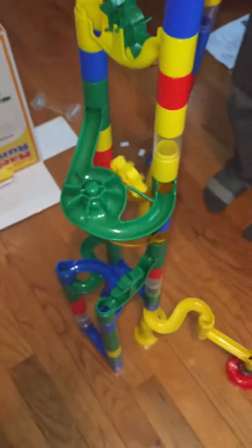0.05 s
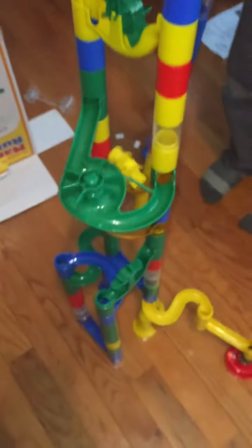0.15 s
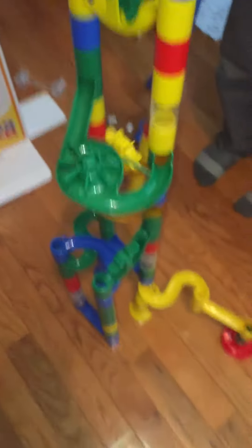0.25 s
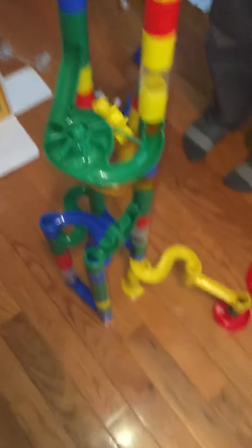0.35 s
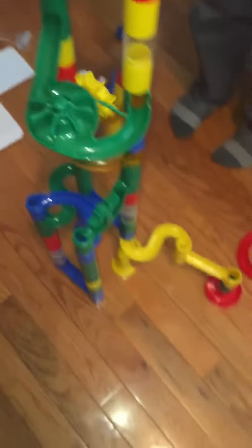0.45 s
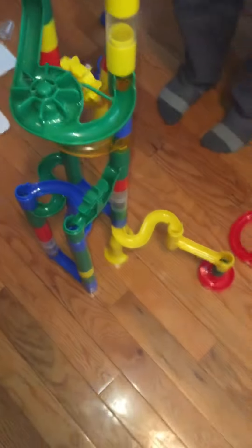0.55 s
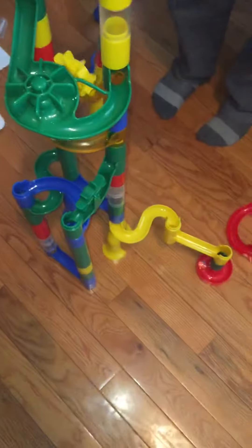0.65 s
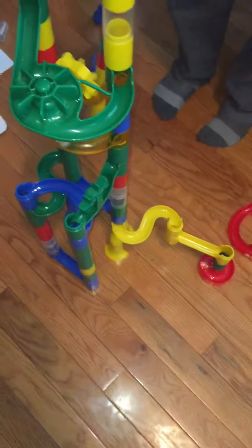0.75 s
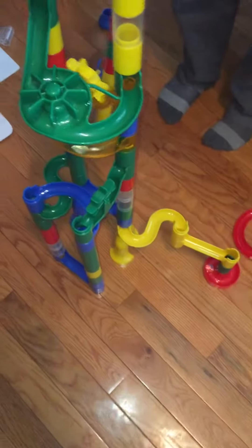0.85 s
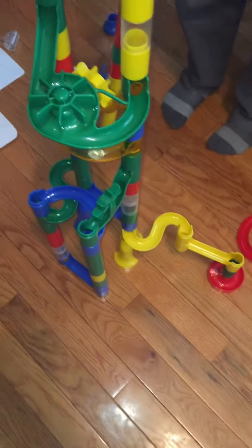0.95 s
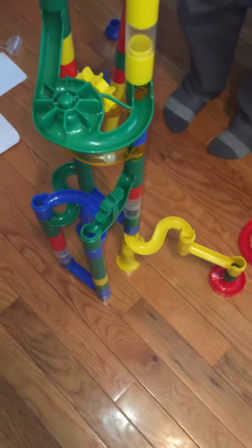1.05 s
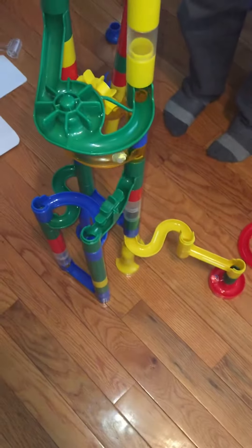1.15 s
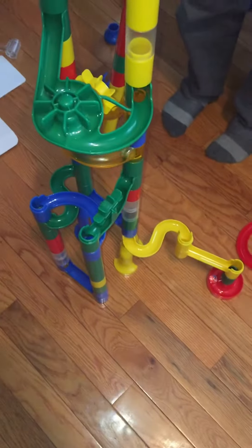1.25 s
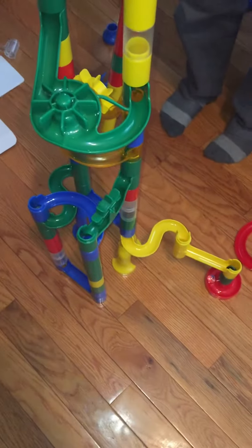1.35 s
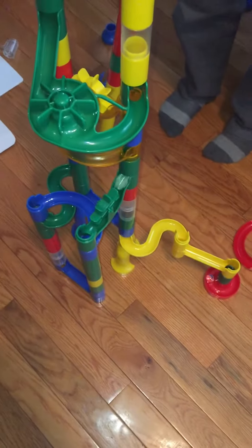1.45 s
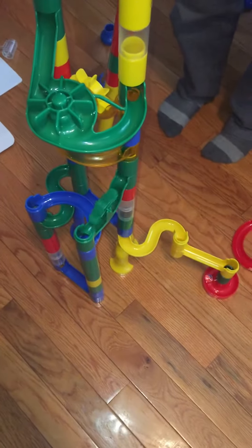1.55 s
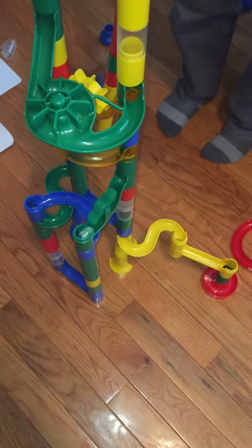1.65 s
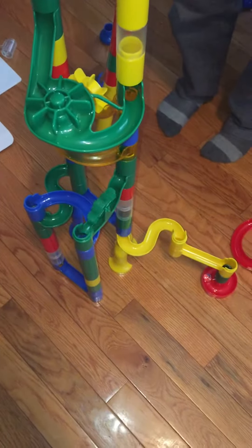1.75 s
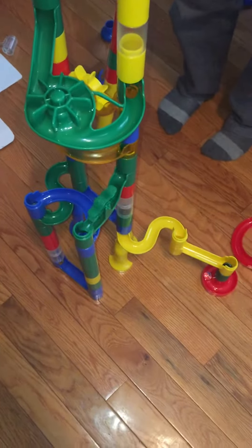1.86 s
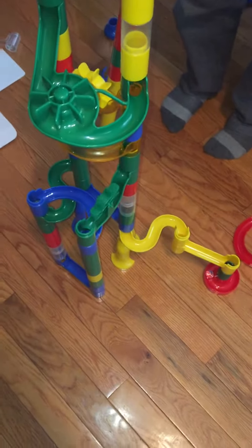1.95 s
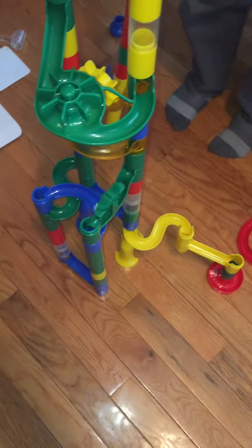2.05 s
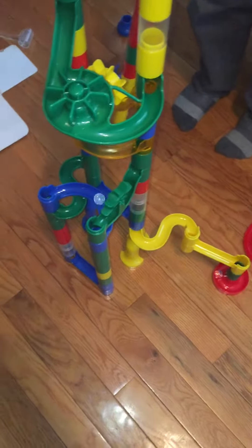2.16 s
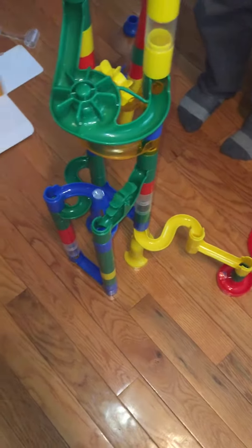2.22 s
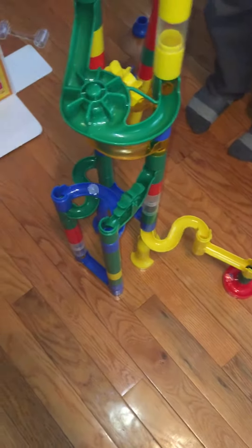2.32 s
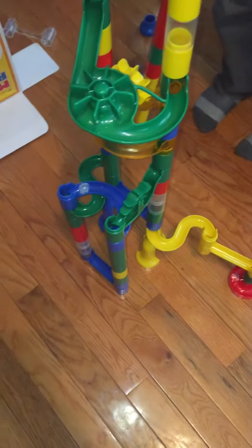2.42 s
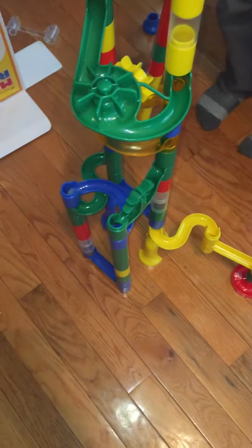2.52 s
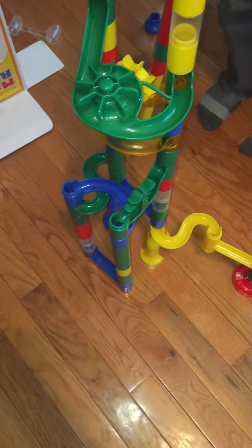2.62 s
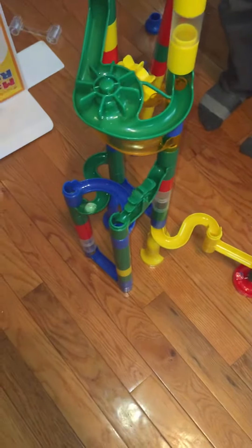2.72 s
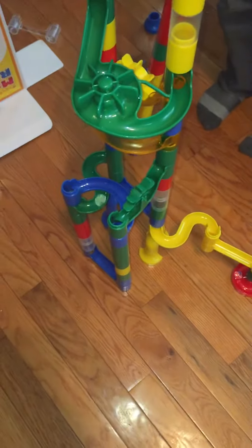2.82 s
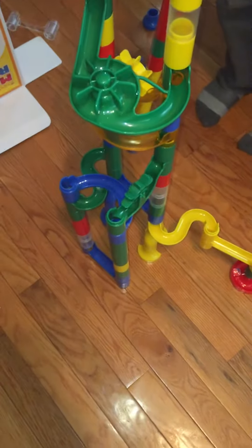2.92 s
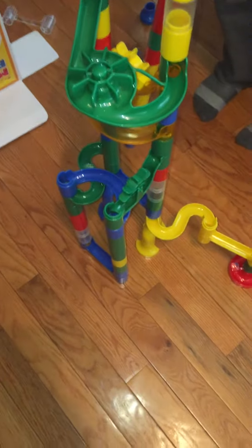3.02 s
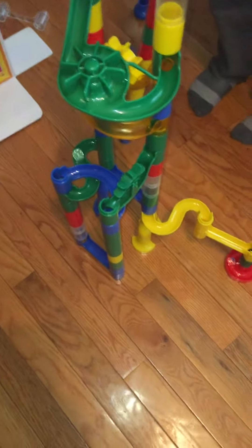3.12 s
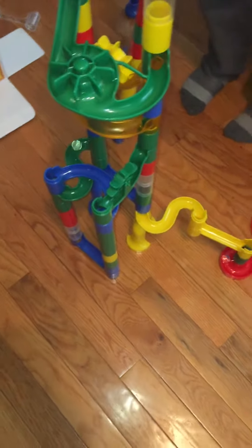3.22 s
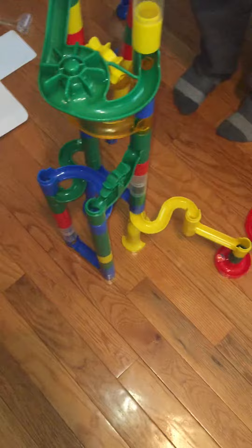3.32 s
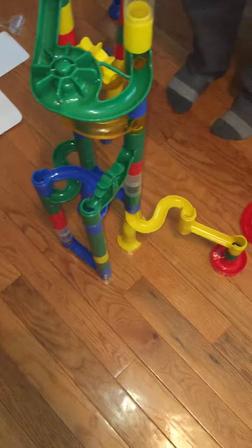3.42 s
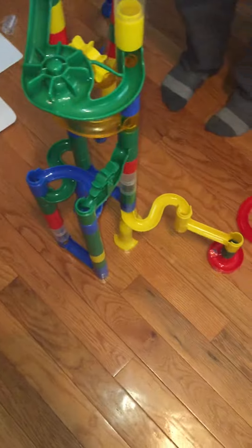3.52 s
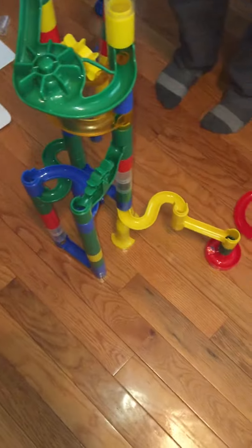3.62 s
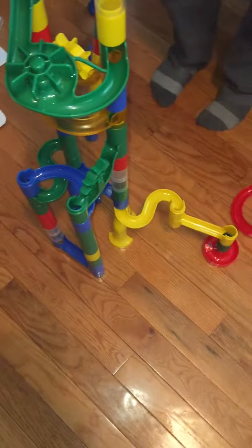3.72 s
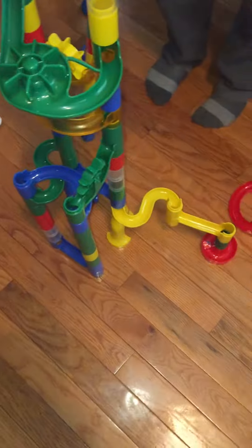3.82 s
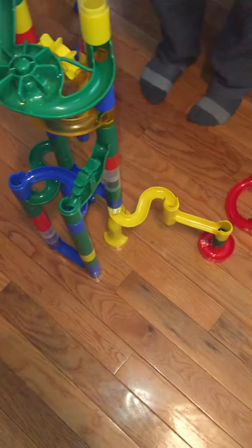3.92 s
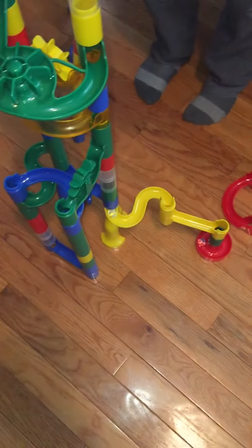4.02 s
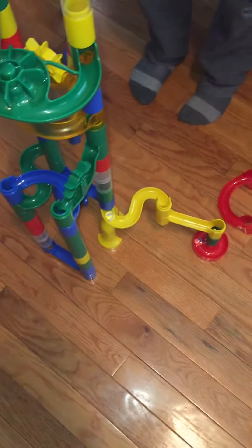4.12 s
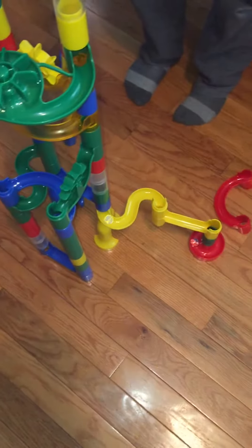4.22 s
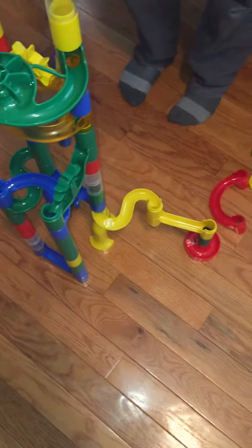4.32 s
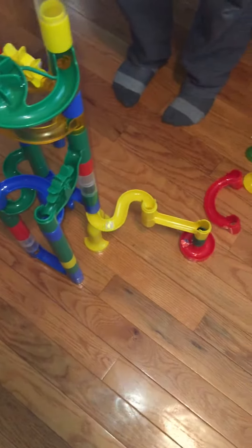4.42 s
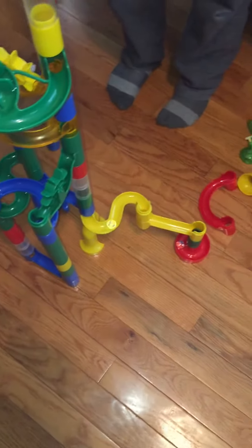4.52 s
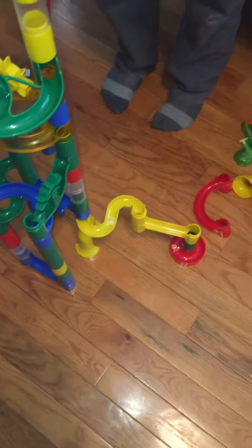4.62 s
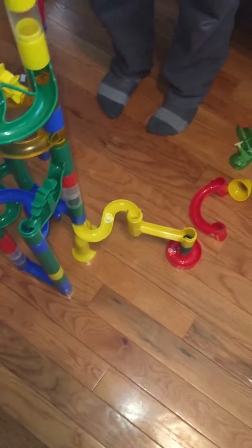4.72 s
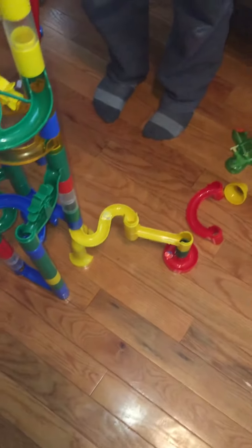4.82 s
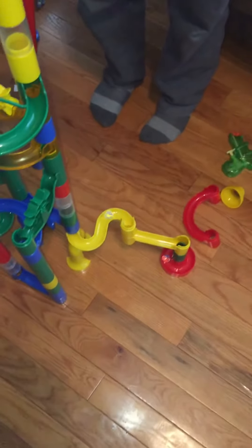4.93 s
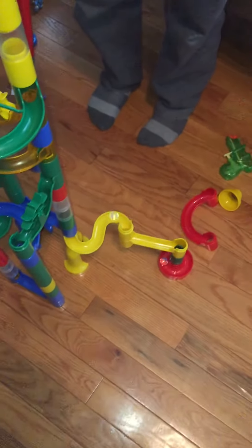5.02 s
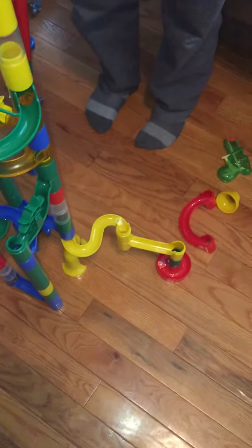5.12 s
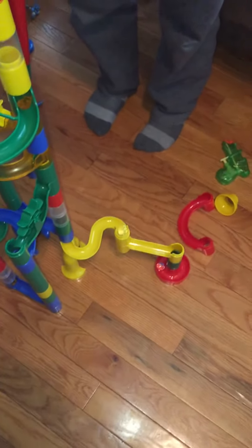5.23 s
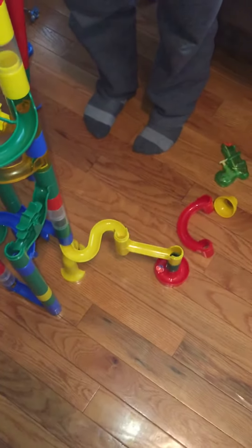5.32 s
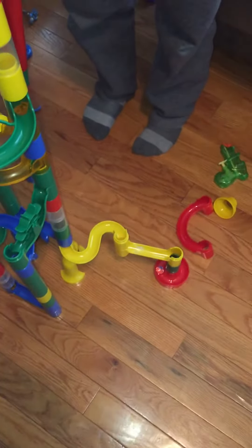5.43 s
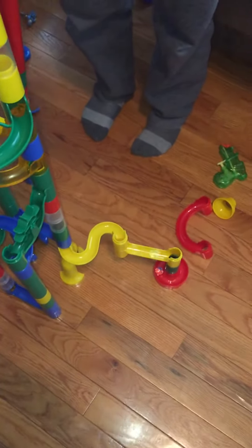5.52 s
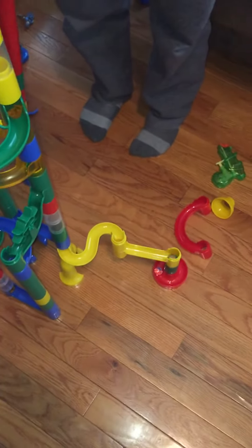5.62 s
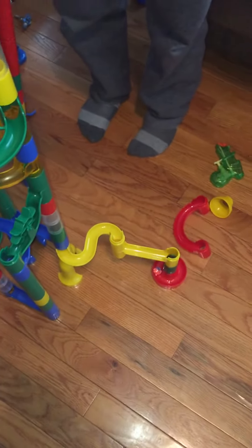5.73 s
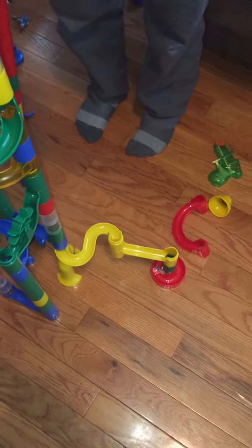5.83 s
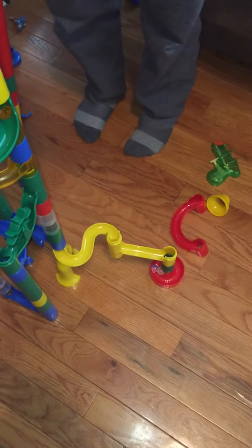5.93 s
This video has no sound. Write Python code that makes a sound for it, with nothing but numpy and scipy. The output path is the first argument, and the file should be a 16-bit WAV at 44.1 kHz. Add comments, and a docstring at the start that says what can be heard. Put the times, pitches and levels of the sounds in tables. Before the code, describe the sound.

A glass marble descends a plastic toy tower in a quiet home room. A hard clatter opens, a faint roll follows, then clustered knocks with a tiny bright glass clink near 1.5 seconds. More rattling drops alternate with gritty rolls and ticks, then a low quiet roll and two final clatters near the floor. Close small microphone, one channel, short room reflections.

```python
"""A quiet room with a wooden floor, where a glass marble works its way down a plastic toy tower.
Rolling is dense random tiny blows, a few much stronger, that ring the piece, over a noise rumble.
Falls are knocks and chatter: noise bursts for the clack, decaying sines for the piece and its support.
Three bright bursts are glass on glass; the lowest pieces shake the floorboards instead of the tower.
Behind: a few soft deep bumps, room air as coloured noise and a thin whine."""
import sys
import numpy as np
from scipy import signal
from scipy.fft import rfft, irfft, next_fast_len
from scipy.io import wavfile
from scipy.ndimage import map_coordinates

SR = 44100
rng = np.random.default_rng(int(sys.argv[2]) if len(sys.argv) > 2 else 0)


def generate_wav(signal):
    """Clip the signal to [-1, 1] and save it as 16-bit WAV at the path in sys.argv[1]."""
    frames = np.transpose(np.atleast_2d(signal))
    scaled = np.clip(frames, -1, 1) * 32767
    pcm = np.round(scaled).astype(np.int16)
    wavfile.write(sys.argv[1], SR, pcm)


N = 263154
LENGTH = 8192  # samples of one struck sound
T = np.arange(LENGTH) / SR


def rattle(clack_db=22, ring_db=23, contact_hz=9000, radiates_hz=45):
    """Every contact clacks, rings the piece that the marble has reached and shakes its support."""
    track = np.zeros(N)
    for start_s, level_db, body_db, treble_db in contacts():
        _, piece_db, boom_db, piece_modes, support_modes = piece_at(start_s)
        edge_hz = contact_hz * amp(treble_db / 2)
        piece = amp(piece_db) * softened(ring(piece_modes, scatter_db=-1.0), edge_hz)
        boom = amp(boom_db + body_db / 2) * ring(support_modes, scatter_db=2.5)
        blow = amp(clack_db) * clack(body_db, treble_db, edge_hz)
        blow = blow + amp(ring_db) * (piece + boom)
        add(track, start_s, amp(level_db) * in_room(blow, wet_db=-6))
    return thinned(track, radiates_hz)


# Falls through a tube onto the next piece. Each row: start in seconds, treble in dB and body in dB
# of its knocks before the shifts with age and force, chatter in dB at the start.
DROPS = [(0, -12, -10.5, -31), (1.403, -5, -13, -31.5), (1.767, -4, -9, -32.5), (2.634, -2.5, -4, -30.5),
         (3.514, -4, -8.5, -32.5), (3.862, -5, -16, -31), (5.376, -7.5, -11, -34), (5.718, -3, -14, -32)]
# Hard knocks of those falls. Each row: start in seconds, relative level in dB.
KNOCKS = [(0.0003, -11.5), (0.0362, -20.5), (0.0803, -24), (0.1063, -23.5), (0.1445, -27), (1.4046, -18),
          (1.4176, -19.5), (1.4715, -14.5), (1.4846, -18.5), (1.5011, -12), (1.5965, -22.5),
          (1.6165, -26.5), (1.7679, -18), (1.7917, -25), (1.8092, -24.5), (1.8361, -16.5), (1.8522, -25),
          (1.8924, -22), (2.6352, -20.5), (2.653, -25.5), (2.6939, -24), (2.7178, -24), (2.756, -25.5),
          (2.7817, -32.5), (3.5143, -20.5), (3.529, -23), (3.5732, -18), (3.583, -18), (3.5954, -21.5),
          (3.6277, -18.5), (3.8634, -17), (3.8831, -22), (3.9236, -13), (3.9363, -24), (3.9492, -18.5),
          (3.9899, -21.5), (4.0248, -23), (4.0468, -27), (5.3769, -26.5), (5.3932, -22.5), (5.4057, -20.5),
          (5.4355, -21.5), (5.461, -30.5), (5.7203, -19), (5.7395, -20.5), (5.754, -25.5), (5.7917, -18.5),
          (5.8284, -16.5), (5.8826, -24.5), (5.91, -27)]
# Light touches on a rim or joint while rolling. Each row: start in seconds, relative level in dB,
# treble in dB.
TICKS = [(1.296, -48.5, -26.5), (1.3314, -42.5, -38.5), (1.3609, -54.5, -25), (1.3766, -56.5, -28),
         (1.7346, -38.5, -21.5), (2.1958, -51.5, -13), (2.3405, -49, -21), (2.4661, -48, -20),
         (2.5472, -45, -14), (2.5786, -38, -14.5), (3.1249, -54, -15), (3.1862, -33, -6),
         (3.4357, -47, -21), (3.4805, -43, -20.5), (4.4463, -45, -3), (4.655, -58.5, -19.5),
         (4.962, -44, -15.5), (5.2896, -54, -15), (5.6545, -36, -19.5)]


def contacts(chatter_count=6, chatter_s=0.15, chatter_fade_db_per_s=28, tick_body_db=-9.5,
             dulling_db_per_s=34.5, body_fill_db_per_s=23, usual_knock_db=-26, body_give=0.6):
    """Knocks, chatter and ticks as (s, dB, body dB, treble dB); later bounces are softer contacts."""
    blows = list(KNOCKS)
    for start_s, _, _, chatter_db in DROPS:
        slots = np.arange(chatter_count) + rng.random(chatter_count)
        for age_s in chatter_s * slots / chatter_count:
            level_db = chatter_db - chatter_fade_db_per_s * age_s + rng.normal(0, 1.5)
            blows.append((start_s + age_s, level_db))

    rows = [(start_s, level_db, tick_body_db, treble_db) for start_s, level_db, treble_db in TICKS]
    for blow_s, level_db in blows:
        # a fall takes over 0.1 s before its start
        fall = sum(blow_s >= drop[0] - .1 for drop in DROPS[1:])
        start_s, treble_db, body_db, _ = DROPS[fall]
        age_s = blow_s - start_s
        # low in the tube, bounces shake more of the tower
        body_db += body_fill_db_per_s * age_s
        # a harder knock gains mostly clack: body_give dB of body lost per dB above the usual
        body_db -= body_give * max(level_db - usual_knock_db, 0)
        rows.append((blow_s, level_db, body_db, treble_db - dulling_db_per_s * age_s))
    return rows


# Resonances of each piece of track. Each row: frequency in Hz, width in Hz, level in dB.
TOP_RAMP = [(864, 23, -4.5), (1380, 12, 2.5), (1857, 20, 2), (3830, 30, -20.5), (4130, 93, -16),
            (6000, 48, -8)]
AMBER_CURVE = [(895, 37, -6), (1197, 24, -5.5), (1870, 14, -0.5), (2930, 14, -9.5), (3480, 29, 0.5),
               (5600, 57, -22.5), (6440, 190, -11)]
BLUE_CURVE = [(1150, 6.4, -6.5), (1656, 7.2, 5), (2410, 25, 0), (3487, 320, -11.5), (3980, 25, -16.5),
              (6200, 110, -18)]
GREEN_CURVE = [(239, 70, -27), (770, 25, -17), (1690, 12, 13.5), (2400, 56, 0), (3153, 140, 6.5),
               (5800, 95, -13), (6160, 120, -15)]
LOW_CURVE = [(866, 34, 5), (1860, 28, 9.5), (2000, 58, -3.5), (2520, 72, 6), (4100, 440, -3),
             (4490, 38, -1)]
YELLOW_BEND = [(876, 45, 0), (1213, 11, 2), (1828, 23, 8.5), (2406, 73, -6), (3250, 39, -7.5),
               (5370, 29, -29.5), (6050, 110, -15)]
LAST_RAMP = [(1505, 44, -10), (1766, 53, 1.5), (1770, 34, -2.5), (2430, 44, -2), (2890, 56, 2),
             (3700, 39, 5.5), (4550, 140, 0.5), (5240, 44, -16.5)]
RAMP_END = [(1498, 15, 0.5), (1798, 29, 0.5), (2632, 26, -0.5), (2953, 18, 9), (4004, 48, -4),
            (6850, 46, -4)]
END_CUP = [(1387, 41, 1), (1697, 43, 4), (2422, 80, -22.5), (3510, 50, -2.5), (4300, 53, -3.5),
           (4600, 70, -1.5)]
SMALL_LOOP = [(585, 43, 4), (2000, 45, -14), (2610, 35, 5), (2980, 73, -0.5), (3400, 19, 8)]
YELLOW_CREST = [(594, 23, -0.5), (1745, 46, -9), (2760, 29, -0.5), (3340, 93, -1)]
# Low resonances of what carries the piece. Each row: frequency in Hz, width in Hz, level in dB.
TOWER = [(85, 6.7, -6), (202, 20, 4), (239, 18, -8.5), (387, 13, -4.5), (475, 11, 0.5), (570, 13, 4.5),
         (632.7, 27, -4)]
STEM = [(212, 25, -6.5), (390, 22, -10), (449, 28, -0.5), (492, 16, 3), (640, 36, -0.5), (953, 44, 0)]
HANGING_ARM = [(216, 15, 0.1), (256, 30.2, 0.16), (274.3, 12, 0.56), (329, 3.3, 0), (366, 14.2, 0.045)]
BOARDS = [(71.7, 11, -21), (138.6, 12.2, -3), (291.3, 10.5, 2.5), (469, 11, 0), (571.6, 12.5, -7)]
# The way down. Each row: start in seconds from which the piece is struck, relative ring in dB,
# relative boom in dB, resonances of the piece, resonances of its support.
PIECES = [(0, -6, -18, TOP_RAMP, TOWER), (1.2, -3.5, -10, AMBER_CURVE, STEM),
          (1.68, -2.5, -15, BLUE_CURVE, TOWER), (2.62, -6.5, -7, GREEN_CURVE, HANGING_ARM),
          (3.0, -5.5, -12.5, SMALL_LOOP, HANGING_ARM), (3.4, -4, -14, LOW_CURVE, TOWER),
          (3.84, -4, -5, YELLOW_BEND, STEM), (4.8, 2, -17.5, YELLOW_CREST, TOWER),
          (5.2, -0.5, 2, YELLOW_BEND, STEM), (5.37, -1.5, -6, LAST_RAMP, BOARDS),
          (5.6, 2.5, -9, RAMP_END, BOARDS), (5.78, -2, -7.5, END_CUP, BOARDS)]


def piece_at(time_s):
    """The piece of track that the marble has reached at time_s."""
    return PIECES[sum(time_s >= piece[0] for piece in PIECES[1:])]


def ring(modes, scatter_db):
    """Struck modes of energy 1; each blow lands elsewhere and shares its force anew."""
    hz, width_hz, level_db = np.transpose(modes)[:, :, None]
    gain = amp(level_db + scatter_db * rng.standard_normal(hz.shape)) * width_hz
    gain = gain * rng.choice([-1, 1], hz.shape)
    decay = np.exp(-np.pi * width_hz * T)
    sound = np.sum(gain * decay * np.sin(2 * np.pi * hz * T), 0)
    return sound / np.linalg.norm(sound)


def clack(body_db, treble_db, edge_hz):
    """Slow bending waves need a moment to spread over the piece; treble comes first and dies first."""
    body = burst([(90, -27.5), (200, 5), (950, -0.5), (1300, -17.5)], t60_s=0.11, rise_s=.002)
    middle = burst([(900, -31.5), (1200, 1), (4500, -2.5), (5600, -26)], t60_s=0.031, rise_s=0.00074)
    treble = burst([(4200, -30), (5200, 0)], t60_s=.018, rise_s=.0003)
    return amp(body_db) * body + softened(middle, 2 * edge_hz) + amp(treble_db) * treble


# Spectrum of the struck plastic shell. Each row: frequency in Hz, level in dB per Hz.
SHELL = [(50, -25.5), (150, -9.5), (400, -23.5), (750, -11.5), (1100, -6), (1700, 5), (2700, 2), (3700, 5),
         (4900, -5), (7000, -11.5), (10200, -18), (11800, -20), (16000, -27)]


def burst(band, t60_s, rise_s):
    """One band of the crowded, heavily damped modes of thin plastic, struck once; energy 1."""
    sound = colour(noise(SHELL, LENGTH), band)
    sound = sound * fade(T, t60_s) * (1 - np.exp(-T / rise_s))
    return sound / np.linalg.norm(sound)


# Clicks of glass on glass. Each row: start in seconds, level in dB.
GLASS_CLICKS = [(1.5629, -13.5), (1.5756, -14.5), (1.5855, -16.5)]
# Spectrum of a glass click. Each row: frequency in Hz, level in dB per Hz.
GLASS = [(500, -16), (3200, -8.5), (5500, -6), (9300, -4), (10300, -12.5), (11200, 2), (12500, 2.5),
         (13800, -8.5), (16000, -16)]


def glass(t60_s=.009):
    """Glass meets glass: very short, very bright clicks of decaying noise."""
    track = np.zeros(N)
    for start_s, level_db in GLASS_CLICKS:
        click = noise(GLASS, LENGTH) * fade(T, t60_s)
        add(track, start_s, amp(level_db) * in_room(click, wet_db=-7.0, floor_echo=.2))
    return track


# Spectrum of the drumming track. Each row: frequency in Hz, level in dB per Hz.
RUMBLE = [(40, -30), (90, -8), (180, -9), (265, 1), (380, -9), (600, -16.5), (1200, -25), (3000, -51.5)]
# Spectrum of the shell's answer to tiny bumps. Each row: frequency in Hz, level in dB per Hz.
GRIT = [(200, -29.5), (600, -8.5), (900, -4), (1150, -6), (1500, 3.5), (1850, 3.5), (2300, -9), (3400, -10),
        (4700, -20), (7000, -29.5), (10000, -35.5), (16000, -46.5)]


def rolling(rumble_db=-1, grit_db=-2, lumps_db=3, flutter_db=3, contact_hz=2400, skips_per_s=800):
    """The turning marble drums the track and skips over tiny bumps, which ring the piece under it."""
    rumble_gain, grit_gain, ring_gain = roll_gains()
    rumble = noise(RUMBLE, N) * unit(amp(lumps_db * wobble(28)))
    # the marble presses harder and lighter as it sways between the rims
    pressure = amp(flutter_db * wobble(30))
    blows = unit(skips(skips_per_s) * pressure)
    # the plastic answers a little differently on each short stretch of the way
    grit = np.zeros(N)
    stretch = SR // 12
    for start in range(0, N, stretch):
        here = slice(start, start + stretch)
        shell = noise(GRIT, LENGTH) * fade(T, 0.092)
        shell = amp(grit_db) * shell / np.linalg.norm(shell)
        piece_modes = piece_at(start / SR)[3]
        piece = softened(ring(piece_modes, scatter_db=9.5), contact_hz)
        shell_answer = signal.fftconvolve(grit_gain[here] * blows[here], shell)
        piece_answer = signal.fftconvolve(ring_gain[here] * blows[here], piece)
        add(grit, start / SR, in_room(shell_answer + piece_answer, wet_db=-7))
    return amp(rumble_db) * rumble_gain * rumble + grit


# Rolls along one piece. Each row: start in seconds, end in seconds, relative grit in dB (the roll
# ends half the gain below it), gain on the way in dB, rumble in dB and ring in dB over the grit.
ROLLS = [(0.418, 1.3, -76, 2, 6, -13.5), (1.315, 1.766, -43.5, 4, -12, -4), (2.02, 2.632, -47, 13, 3, -16),
         (2.8, 3.06, -60.5, -8, -6, -2), (3.12, 3.452, -60.5, -3.5, -4, -9), (3.55, 3.867, -42, 3, -13, -4),
         (4.23, 4.566, -74.5, -2.5, 12.5, -8), (4.62, 5.276, -71, 1.5, 8.5, -9),
         (5.31, 5.7, -41.5, 11, -10, 1)]


def roll_gains(edge_s=0.03):
    """Gains of rumble, grit and ring: a roll grows as the marble gathers speed, or fades as it slows."""
    t = np.arange(N) / SR
    gains = np.zeros((3, N))
    for start_s, end_s, grit_db, gained_db, rumble_db, ring_db in ROLLS:
        way = np.clip((t - start_s) / (end_s - start_s), 0, 1)
        outside_s = np.abs(t - np.clip(t, start_s, end_s))
        gain = amp(grit_db - gained_db * (1.5 - way)) * np.exp(-(outside_s / edge_s) ** 2)
        shares = np.array([[amp(rumble_db)], [1], [amp(ring_db)]])
        gains = np.maximum(gains, gain * shares)
    return gains


def skips(per_s):
    """Random tiny blows, a few much stronger than the rest."""
    return (rng.random(N) < per_s / SR) * rng.laplace(size=N)


# Dull bumps. Each row: start in seconds, level in dB, swell in seconds, low cut in Hz.
BUMPS = [(.5, -58, 0.021, 25), (1.069, -51, 0.0087, 140), (1.13, -58, 0.028, 25), (2.271, -66, .025, 25)]
# Spectrum of a bump. Each row: frequency in Hz, level in dB per Hz.
BUMP = [(15, -19), (32, 8), (55, -3), (140, -6), (300, -19), (800, -32), (3000, -80)]


def soft_bumps():
    """Soft, deep bumps: low noise that swells to a peak after swell_s and dies away."""
    track = np.zeros(N)
    for start_s, level_db, swell_s, low_hz in BUMPS:
        thud = unit(thinned(noise(BUMP, LENGTH), low_hz))
        swell = T / swell_s * np.exp(1 - T / swell_s)
        add(track, start_s, amp(level_db) * thud * swell)
    return track


# Spectrum of the room air. Each row: frequency in Hz, level in dB per Hz.
AIR = [(15, -39), (25, -7), (69, 0.5), (103, -9), (202, -7), (264, -3.5), (462, -16), (952, -10.5),
       (1910, -17), (2070, -20.5), (3830, -22), (4150, -23), (15000, -34)]


def background(air_db=-66, whine_db=-74, whine_hz=15735):
    """Still room air and the thin whine of some electric appliance, its level wandering."""
    whine = np.sqrt(2) * np.sin(2 * np.pi * whine_hz * np.arange(N) / SR)
    return amp(air_db) * noise(AIR, N) + amp(whine_db + 2.5 * wobble(5)) * whine


# Decay of the room. Each row: frequency in Hz, t60 in seconds.
ROOM = [(100, 0.76), (300, 0.16), (800, 0.44), (2000, 0.44), (5000, 0.33), (9000, 0.29), (15000, 0.15)]


def in_room(x, wet_db, floor_echo=0.61, floor_s=.0026, build_s=0.0024):
    """The direct sound, its mirror image in the floor and a diffuse tail, new for each spot."""
    hz, t, z = signal.stft(rng.standard_normal(SR // 2), SR, nperseg=256)
    tail = signal.istft(z * fade(t, along(ROOM, hz)[:, None]), SR, nperseg=256)[1]
    tail = tail * (1 - np.exp(-np.arange(len(tail)) / SR / build_s))
    response = amp(wet_db) * tail / np.linalg.norm(tail)
    response[0] += 1
    response[round(floor_s * SR * rng.uniform(.7, 1.3))] += floor_echo
    return signal.fftconvolve(x, response)


def softened(x, edge_hz):
    """A gentler contact lasts longer and passes on less above edge_hz."""
    return signal.sosfilt(signal.butter(2, min(edge_hz, .45 * SR), fs=SR, output="sos"), x)


def thinned(x, low_hz):
    """Something small passes on little below low_hz."""
    return signal.sosfilt(signal.butter(2, low_hz, "high", fs=SR, output="sos"), x)


def amp(db):
    """Decibels to gain."""
    return 10 ** (np.asarray(db) / 20)


def unit(x):
    """x at rms 1."""
    return x / np.sqrt(np.mean(x ** 2) + 1e-20)


def along(points, hz):
    """(Hz, value) points read on a log axis."""
    point_hz, value = np.transpose(points)
    return np.interp(np.log(hz + 1), np.log(point_hz + 1), value)


def fade(t, t60_s):
    """A free decay, 60 dB in t60_s."""
    return np.exp(-np.log(1000) * t / t60_s)


def colour(x, spectrum):
    """x filtered by (Hz, dB) points."""
    size = next_fast_len(len(x) + LENGTH)
    gain = amp(along(spectrum, np.fft.rfftfreq(size, 1 / SR)))
    return irfft(rfft(x, size) * gain, size)[:len(x)]


def noise(spectrum, size):
    """Coloured noise of rms 1."""
    return unit(colour(rng.standard_normal(size), spectrum))


def wobble(knots_per_s):
    """A smooth random curve through random knots."""
    knots = rng.standard_normal(int(N * knots_per_s / SR) + 4)
    return map_coordinates(knots, [np.arange(N) * knots_per_s / SR])


def add(track, start_s, sound):
    """Mix a sound into the track at start_s."""
    start = max(round(start_s * SR), 0)
    track[start:start + len(sound)] += sound[:N - start]


def scene():
    """The marble, the soft bumps and the room, in one channel."""
    return (rattle() + glass() + rolling() + soft_bumps() + background())[None]


def record(dry, low_cut_hz=50, top_hz=16300):
    """A small microphone thins deep bass and rounds the highest peaks; nothing passes top_hz."""
    thin = thinned(dry, low_cut_hz)
    rounded = thin / (1 + (thin / .8) ** 6) ** (1 / 6)
    size = next_fast_len(N + LENGTH)
    passed = np.fft.rfftfreq(size, 1 / SR) < top_hz
    return irfft(rfft(rounded, size) * passed, size)[:, :N]


dry = scene()
out = record(dry)
generate_wav(out)
```